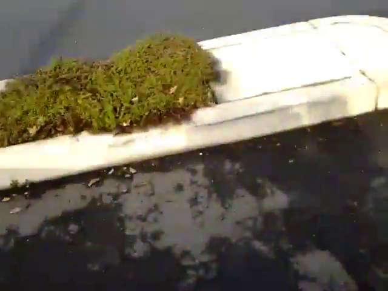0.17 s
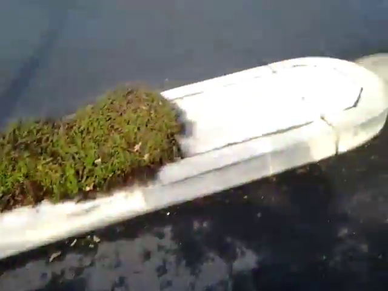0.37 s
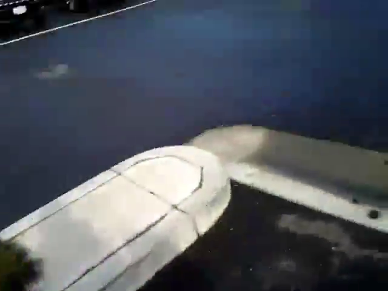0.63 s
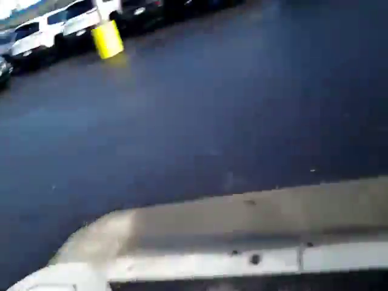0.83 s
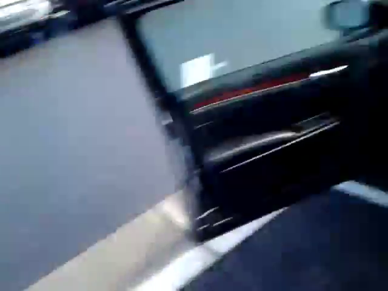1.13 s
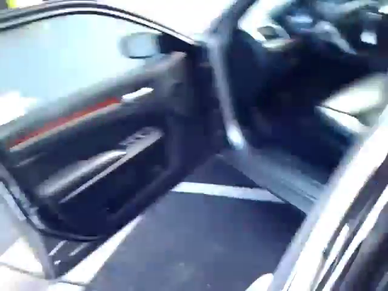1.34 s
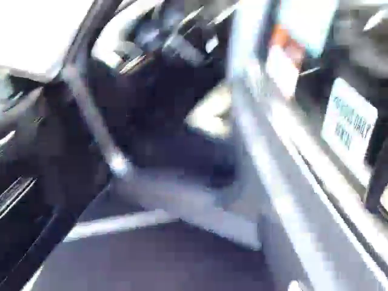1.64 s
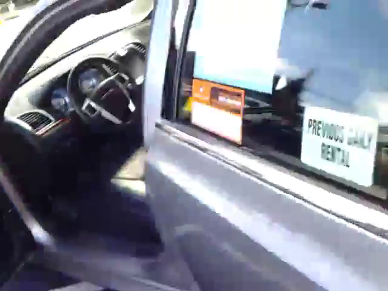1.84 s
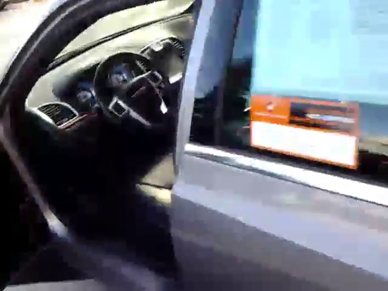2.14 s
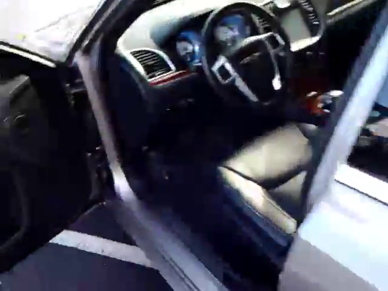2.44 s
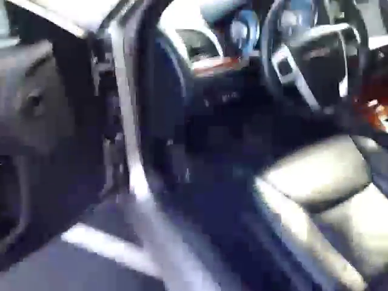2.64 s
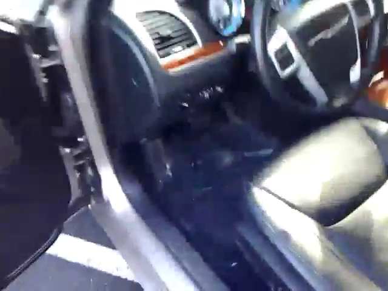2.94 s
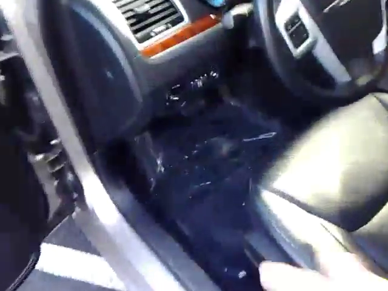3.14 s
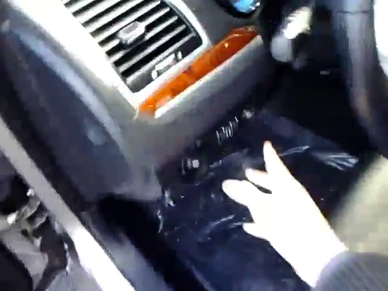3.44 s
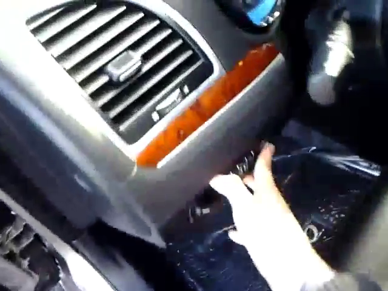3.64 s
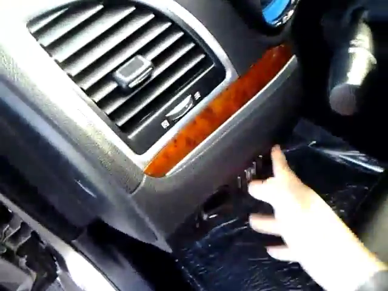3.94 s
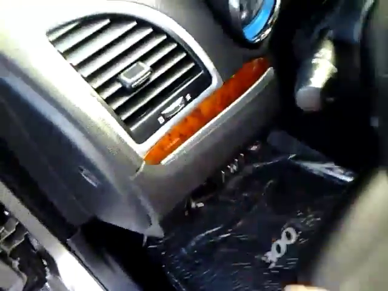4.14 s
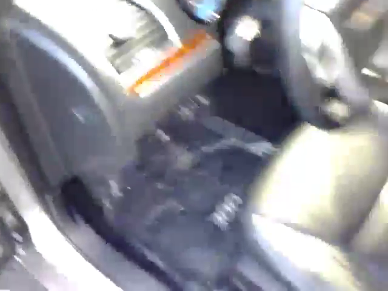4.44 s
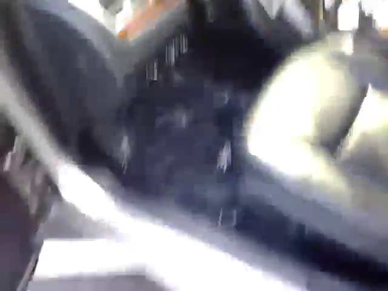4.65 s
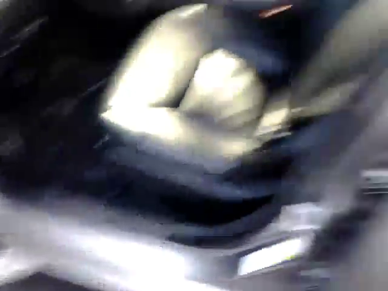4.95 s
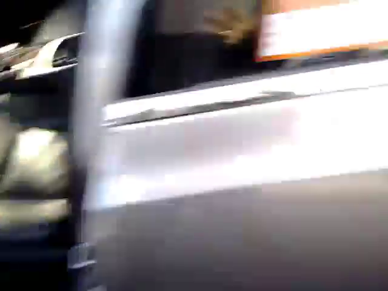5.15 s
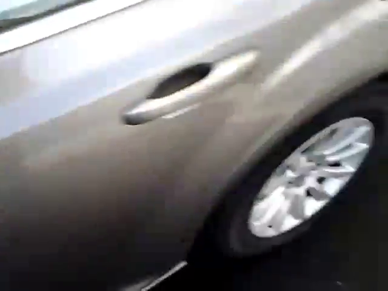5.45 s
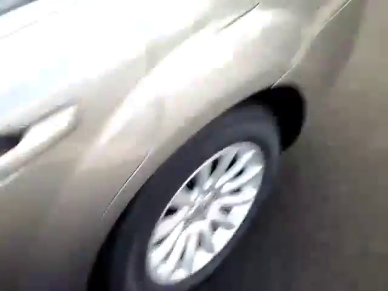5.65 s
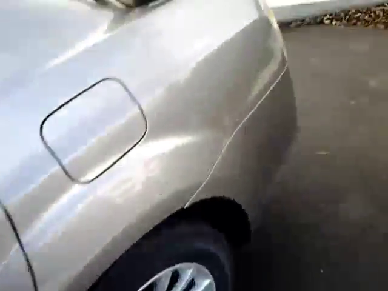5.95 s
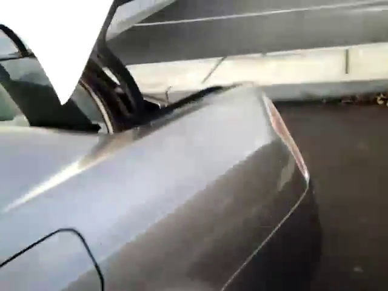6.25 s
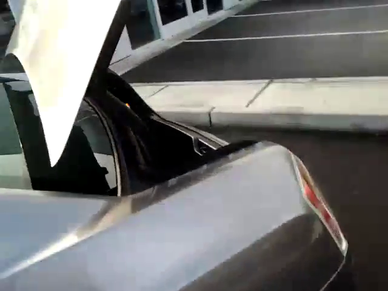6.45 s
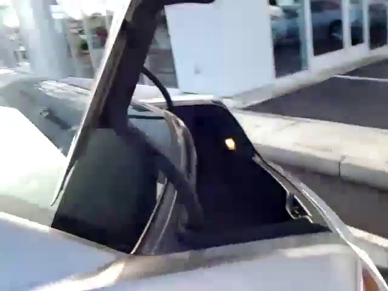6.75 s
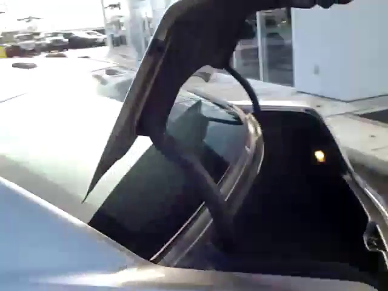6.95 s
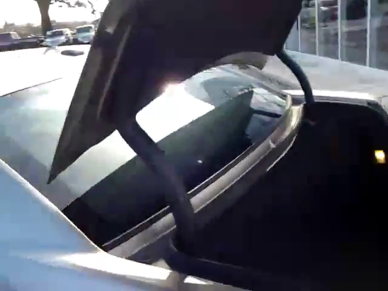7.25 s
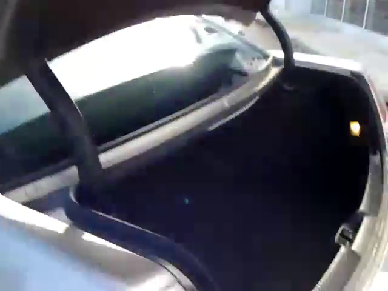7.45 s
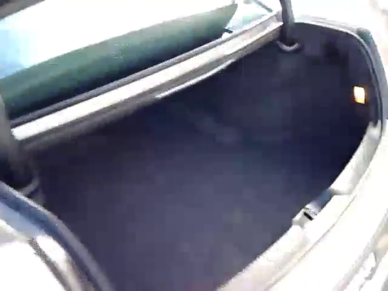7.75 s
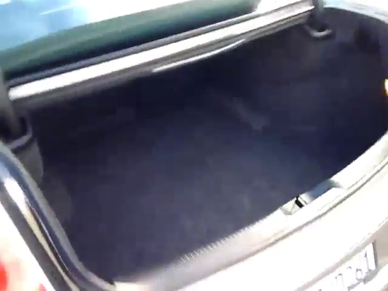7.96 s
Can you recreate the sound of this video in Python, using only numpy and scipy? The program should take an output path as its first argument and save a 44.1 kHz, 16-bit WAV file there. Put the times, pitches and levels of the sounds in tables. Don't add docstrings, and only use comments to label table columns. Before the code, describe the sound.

Open parking lot, heard from a hand-held microphone carried around a car. Low traffic rumble and a thin wavering hum lie underneath. Small clicks and scuffs come first, then a solid door slam with rattling parts. A bright latch snap and duller knock follow, then light taps and a metallic thump as the sprung lid hits its stop. Cloth rustles close by.

```python
import sys
import numpy as np
from scipy import signal
from scipy.io import wavfile
from scipy.ndimage import uniform_filter1d

SR = 44100
rng = np.random.default_rng(int(sys.argv[2]) if len(sys.argv) > 2 else 0)


def generate_wav(signal):
    frames = np.transpose(np.atleast_2d(signal))
    scaled = np.clip(frames, -1, 1) * 32767
    pcm = np.round(scaled).astype(np.int16)
    wavfile.write(sys.argv[1], SR, pcm)


def to_linear_factor(level_db):
    exponent = np.asarray(level_db, float) / 20
    return 10 ** exponent


N = 356724


def rms_one(x):
    return x / np.sqrt(np.mean(x ** 2) + 1e-20)


def in_time(rows):
    s, *columns = np.transpose(rows)
    return [np.interp(np.arange(N) / SR, s, c) for c in columns]


def drift(rate_hz):
    r = np.exp(-2 * np.pi * rate_hz * 40 / SR)
    white = rng.standard_normal(N // 40 + 2002)
    slow = signal.lfilter([1], [1, -2 * r, r * r], white)[2000:]
    return np.interp(np.arange(N) / 40, np.arange(len(slow)), rms_one(slow))


def cut(x, hz, kind, order=2):
    sos = signal.butter(order, np.clip(hz, 10, .45 * SR), kind, fs=SR, output="sos")
    return signal.sosfilt(sos, x)


def resonate(x, hz, width_hz):
    r = np.exp(-np.pi * width_hz / SR)
    poles = [1, -2 * r * np.cos(2 * np.pi * hz / SR), r * r]
    return signal.lfilter([(1 - r * r) / 2, 0, (r * r - 1) / 2], poles, x)


def shelf(x, top_db, edge_hz=6000):
    low = cut(x, edge_hz, "low", order=4)
    high = cut(x, edge_hz, "high", order=4)
    return low + to_linear_factor(top_db - 5) * high


def add(out, start_s, sound):
    i = round(start_s * SR)
    out[i:i + len(sound)] += sound[:N - i]


def banded(white, spectrum, patchy_db):
    hz, level_db = np.transpose(spectrum)
    edges_hz = hz[0] * 2 ** np.arange(0, np.log2(hz[-1] / hz[0]) + .3, 1 / 3)
    out = 0
    for k, (low_hz, high_hz) in enumerate(zip(edges_hz, edges_hz[1:])):
        band_db = np.interp(np.log(low_hz * high_hz) / 2, np.log(hz), level_db)
        band = cut(white[k % 2], [low_hz, high_hz], "band")
        out = out + to_linear_factor(band_db + patchy_db * drift(8.1)) * band
    return rms_one(out)


def burst(draws, dying_s, rise):
    noise = draws[:int(2 * dying_s * SR) + 400]
    t = np.arange(len(noise)) / SR
    return noise, t, (1 - np.exp(-t / (rise * dying_s))) * to_linear_factor(-30 * t / dying_s)


# freq_hz, level_db_per_hz
RUMBLE_SPECTRUM = [(15, -46), (25, -4), (49, -17.5), (111, -9), (291, -1), (358, -2), (700, -11.5),
                   (1000, -40)]
ROAR_SPECTRUM = [(250, -3.5), (450, -1), (700, 2.5), (950, 2.5), (1300, -3), (2000, -7), (3000, -14)]
HISS_SPECTRUM = [(1200, 8.5), (2200, 5.5), (3200, -2), (5000, -4), (7000, -11.5), (10000, -15),
                 (15000, -42)]
# time_s, level_db
ROAD_OPENNESS = [(0.0, -40), (0.18, -38.5), (1.19, -34), (1.49, -36.5), (2.34, -36), (2.52, -38.5),
                 (2.79, -39), (3.11, -41), (4.46, -41.5), (4.57, -40), (5.83, -41), (6.06, -40),
                 (6.71, -39.5), (6.91, -40.5), (8.09, -42.5)]


def traffic():
    open_db, = in_time(ROAD_OPENNESS)
    open_db = open_db - open_db.mean()
    white = rng.standard_normal((3, 2, N))
    rumble = to_linear_factor(-45 + .3 * open_db) * banded(white[0], RUMBLE_SPECTRUM, patchy_db=1.5)
    roar = to_linear_factor(-41.5 + open_db) * banded(white[1], ROAR_SPECTRUM, patchy_db=1.3)
    hiss = to_linear_factor(-52 + open_db) * banded(white[2], HISS_SPECTRUM, patchy_db=2.37)
    return rumble + roar + hiss


# time_s, low_tone_db, high_tone_db
FAN_LEVELS = [(0, -50, -66), (1, -51.5, -46.5), (2.2, -48, -51), (2.852, -54, -60), (3.3, -69, -50),
              (4.2, -54, -49.5), (4.8, -68, -62), (5.3, -49, -49.5), (6.4, -54.5, -53), (7, -59, -60),
              (7.5, -55.5, -51), (8.09, -53, -73)]


def hum():
    t = np.arange(N) / SR
    out = 0
    for hz, level_db in zip((124.8, 303), in_time(FAN_LEVELS)):
        waver_db = .8 * drift(9.9)
        out = out + to_linear_factor(level_db + waver_db) * np.sin(2 * np.pi * hz * t)
    return out


# time_s, level_db
MOVEMENT = [(0.0, -45), (0.11, -51.5), (1.2, -59), (1.64, -49.5), (1.93, -43), (2.37, -51.5), (2.62, -49.5),
            (2.81, -46), (2.95, -63), (3.2, -50), (3.45, -47), (3.81, -52.5), (4.59, -49), (5.29, -49.5),
            (6.96, -54), (7.23, -54), (7.84, -57.5), (8.09, -51.5)]
# freq_hz, level_db_per_hz
CLOTH_SPECTRUM = [(1200, -22), (2500, -5.5), (4000, 3), (6500, -6), (10000, -10.5), (15000, -11)]


def rustle():
    level_db, = in_time(MOVEMENT)
    size_db = np.minimum(rng.exponential(1, (2, N)), 5)
    snaps = to_linear_factor(size_db) * rng.choice([-1, 1], (2, N))
    rate_hz = 5000 * to_linear_factor(3 * drift(30))
    born = rng.random((2, N)) < rate_hz / SR
    return to_linear_factor(level_db - 1.5) * banded(snaps * born, CLOTH_SPECTRUM, patchy_db=-3.3)


def contacts(table):
    out = np.zeros(N)
    for (start_s, level_db, top_db, dying_s), draws in zip(table, rng.standard_normal((len(table), 16000))):
        hard, t, shape = burst(draws, dying_s, rise=0.11)
        uneven = hard * np.abs(hard) ** 1.9
        grains = rms_one(cut(uneven, [900, 10000], "band", order=1))
        add(out, start_s, to_linear_factor(level_db + 2) * shelf(grains, top_db) * shape)
    return out


# start_s, level_db, dying_s
SCUFFS = [(0, -36.5, 0.16), (.2, -52, 0.045), (.28, -39, .065), (1.83, -35.5, 0.16), (1.985, -33, 0.24),
          (2.548, -39, 0.077), (2.84, -38, 0.16), (2.884, -35.5, 0.19), (3.335, -36.5, 0.066),
          (3.774, -41, 0.015), (4.415, -42.5, 0.11), (4.802, -30.5, .05), (4.816, -29.5, 0.041),
          (4.831, -42, .036), (5.4, -33, 0.027), (5.429, -49, 0.096), (6.641, -17, .035),
          (6.672, -36.5, 0.093), (7.131, -47, 0.18), (7.35, -43, 0.068)]


def scuffs():
    top_db = -2
    return contacts([(start_s, level_db, top_db, dying_s) for start_s, level_db, dying_s in SCUFFS])


def snaps(table):
    out, t = np.zeros(N), np.arange(600) / SR
    for (start_s, peak_db, top_db, edge_hz), noise in zip(table, rng.standard_normal((len(table), 600))):
        shape = np.exp(-t / 0.00038) + to_linear_factor(-20) * np.exp(-t / 0.0058)
        snap = (t == 0) * 1.8 + noise * shape
        snap = shelf(cut(snap, edge_hz, "high"), top_db)
        add(out, start_s, to_linear_factor(peak_db - 5.5) * snap / np.abs(snap).max())
    return out


# start_s, peak_db, top_octave_db
TICKS = [(0.0224, -29, -23), (0.0593, -18, -25), (0.065, -19, -8), (0.073, -15, -11), (0.0812, -15, -20),
         (0.1904, -4, -14), (0.63, -25, -20), (0.695, -24, -20), (0.7734, -23, -12), (1.3267, -12, -35),
         (1.7445, -21, -25), (2.5433, -15, -15), (2.5514, -26, -26), (2.7182, -32, -30), (2.86, -30, 0),
         (2.9175, -9.5, -20), (2.938, -12, -18), (2.9485, -17.5, -22), (3.817, -21.5, -9), (3.983, -17, -7),
         (4.4092, -11, -18), (4.4139, -3, -17), (4.4764, -21, -15), (4.6226, -13, -10), (5.308, -33, -22),
         (5.4024, -20.5, -23), (5.5108, -21, -12), (7.64, -21, -23), (7.658, -26, -24), (8.0126, -33, -33)]


def ticks():
    low_edge_hz = 2600
    return snaps([(*row, low_edge_hz) for row in TICKS])


# start_s, peak_db, top_octave_db, low_edge_hz
CATCH = [(0.04, -8, 2, 3620), (.0505, -35, -20, 2500), (0.1923, -3.5, -25, 1700), (0.1954, -4, -16, 2300),
         (.245, -29, 0, 4500), (.285, -22, -10, 3000), (0.6336, -13.5, -24, 2800), (1.514, -12, 3, 4300),
         (1.829, -18, 6, 7950), (2.6093, -14, -34, 2720), (2.699, -24, -8, 5500), (4.4148, -12, -18, 1900),
         (4.587, -16.5, -2, 3000), (4.6195, -20, -20, 2500), (4.71, -39, 3, 5520), (4.886, -31, -24, 2500),
         (5.1256, -18, 5, 2600), (5.329, -22, -8, 3520)]


def catch():
    return snaps(CATCH)


def strike(table, contact_s):
    out = np.zeros(N)
    for (start_s, level_db, hz), draws in zip(table, rng.standard_normal((len(table), 12000))):
        dying_s = contact_s + 1.94 / hz
        jolts, t, shape = burst(draws, dying_s, rise=.06)
        push = .3 * np.sin(2 * np.pi * hz * t)
        width_hz = .6 * hz
        thud = resonate(resonate((jolts + push) * shape, hz, width_hz), hz, width_hz)
        add(out, start_s, to_linear_factor(level_db + 6) * thud / np.abs(thud).max())
    return out


# start_s, level_db, pitch_hz
TONGUE = [
    (.1905, -31, 1836),
    (.1926, -24, 2820),
    (.629, -23, 3580),
    (4.4125, -22.5, 2620),
    (4.4135, -39, 1440),
    (2.609, -26.5, 4230),
]


def tongue():
    return strike(TONGUE, contact_s=.006)


# start_s, level_db, top_octave_db, dying_s
RATTLES = [(.629, -35, -27, 0.018), (.641, -32, -18, 0.096), (.69, -34, -9, .04), (5.45, -34.5, -22, 0.053),
           (1.324, -29.5, -19, 0.14), (1.365, -29.5, -22, 0.046), (2.286, -8.5, -40, 0.02),
           (2.298, -4.5, -20, 0.023), (2.307, -20, -18, 0.016), (2.325, -12, -38, 0.023),
           (2.336, -21, -42, 0.053), (2.36, -21, -50, .034), (3.975, -28.5, -19, .03),
           (4.6328, -23, -3, .021), (4.639, -13.5, -35, 0.014), (4.652, -23.5, -12, 0.019),
           (4.87, -32.5, -39, 0.086), (6.579, -35, -19, 0.024), (6.629, -31, -28, 0.035),
           (6.644, -27, -15, 0.012), (6.661, -28, -25, 0.051)]


def rattles():
    return contacts(RATTLES)


# start_s, level_db, pitch_hz
TAPS = [(.631, -34, 1586), (.632, -33, 705), (.633, -38, 302), (2.549, -38, 313), (3.335, -37, 2000),
        (3.773, -34.5, 623), (3.98, -32, 2280), (3.975, -47, 880), (4.802, -32.5, 1390), (4.814, -28, 1746),
        (4.83, -34.5, 1790), (5.225, -31, 455), (5.605, -37.5, 147.7)]


def taps():
    return strike(TAPS, contact_s=.015)


# closest_s, distance_scale_s, exhaust_db, tread_db, pitch_ratio
PASSES = [
    (.75, 0.56, -41, -58, 1.03),
    (1.149, .3, -58, -43, 1.03),
    (1.95, 0.39, -45, -67, .87),
    (6.3, 1.2, -58.5, -46.5, .72),
]


def passing():
    out = 0
    for closest_s, span_s, boom_db, tread_db, pitch in PASSES:
        along = (np.arange(N) / SR - closest_s) / span_s
        near = 1 / (1 + along ** 2)
        exhaust = (240, .04, boom_db, 45)
        tread = (840.5, .02, tread_db, 130)
        for hz, sag, level_db, width_hz in (exhaust, tread):
            glide_hz = pitch * hz * (1 - sag * along * np.sqrt(near))
            turn = 2 * np.pi * np.cumsum(glide_hz) / SR
            tone = rms_one(drift(width_hz) * np.sin(turn) + drift(width_hz) * np.cos(turn))
            out = out + near * to_linear_factor(level_db + 4.5 * drift(11.8)) * tone
    return out


# start_s, level_db, pitch_hz
DOOR = [(2.283, -21, 517), (2.285, -15.5, 345), (2.289, -16, 2210), (2.297, -9.5, 600), (2.2865, -22, 1330),
        (2.297, -14, 1090), (2.301, -12.5, 293), (2.309, -22, 2220), (2.311, -24, 404), (2.324, -19, 288),
        (2.325, -24, 1690), (2.31, -25.5, 152), (2.335, -29, 152), (2.34, -33, 96), (2.335, -19, 743),
        (2.339, -20, 397), (2.35, -20, 313), (2.36, -25.5, 240), (2.362, -21, 600), (2.374, -24, 240),
        (2.385, -28, 543), (2.362, -25, 165.5), (2.402, -33, 344)]


def door():
    return strike(DOOR, contact_s=.014)


# start_s, level_db, pitch_hz
SILL = [
    (4.6328, -22, 890),
    (4.634, -18.5, 454),
    (4.638, -15.5, 327),
    (4.639, -30, 168),
    (4.638, -19, 1090),
    (4.644, -22.5, 685),
    (4.652, -28, 428),
]


def sill():
    return strike(SILL, contact_s=.013)


# start_s, level_db, pitch_hz
LID = [(6.611, -28, 300), (6.629, -25, 1040), (6.634, -27, 2370), (6.636, -27, 600), (6.642, -20, 2110),
       (6.6445, -10, 463), (6.645, -25, 217), (6.65, -37, 96), (6.653, -17.5, 1020), (6.661, -21, 550),
       (6.673, -27, 355), (6.68, -32, 244), (6.689, -30, 504), (6.7, -28, 447), (6.715, -36, 327),
       (6.723, -27, 284), (6.75, -37, 293)]


def lid():
    return strike(LID, contact_s=.0045)


# freq_hz, level_db, t60_s
PANEL = [(116, -3, 0.11), (180.4, -4.5, 0.27), (246, 7, 0.31), (345, -8, 0.93), (498, -30, 0.29),
         (600, 3.5, 0.13), (890, 6, 0.1), (1280, 13, 0.046), (1697, 6, 0.009), (2190, -55, 0.18),
         (2560, -24, 0.064), (3760, -25, 0.086), (4320, 5, .05), (4630, -29, 0.054)]


def panel(knocks):
    out = np.zeros(N)
    for k, (hz, level_db, t60_s) in enumerate(PANEL):
        width_hz = np.log(1000) / np.pi / t60_s
        out += (-1) ** k * to_linear_factor(level_db - 4) * resonate(knocks, hz, width_hz)
    return out


def scene():
    knocks = scuffs() + tongue() + rattles() + taps() + door() + sill() + lid() + 1e-18
    blows = knocks + panel(knocks)
    mono = traffic() + hum() + rustle() + ticks() + catch() + passing() + blows
    return np.array([mono, mono])


def top_cut(x):
    return signal.sosfilt(signal.butter(12, 15700, fs=SR, output="sos"), x)


# freq_hz, width_hz, boost_db
PORT = [(3883, 820, 10.5), (4270, 510, 4.5)]


def record(dry):
    bass_cut_hz, overload_top, side_db, cutoff_hz = 118, .93, -48, 15900
    x = dry + sum((to_linear_factor(boost_db) - 1) * resonate(dry, hz, width_hz) for hz, width_hz, boost_db in PORT)
    x = overload_top * np.tanh(cut(x, bass_cut_hz, "high") / overload_top)
    power = uniform_filter1d(x[0] ** 2, size=600)
    side = to_linear_factor(side_db + 25.5) * power * cut(rng.standard_normal(N), 11000, "low")
    x = x + side * [[1], [-1]]
    x = signal.sosfilt(signal.cheby2(12, 70, cutoff_hz, fs=SR, output="sos"), x)
    return top_cut(x)


dry = scene()
out = record(dry)
generate_wav(out)
```